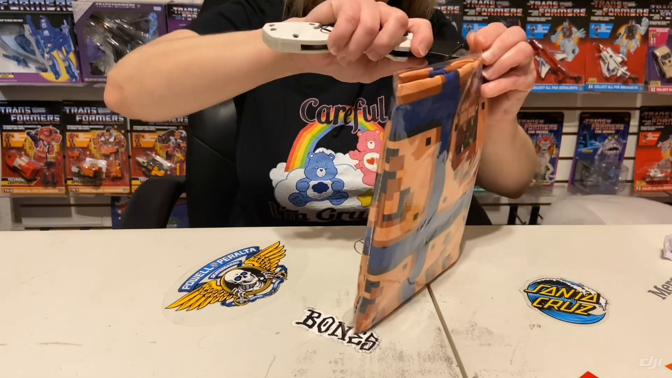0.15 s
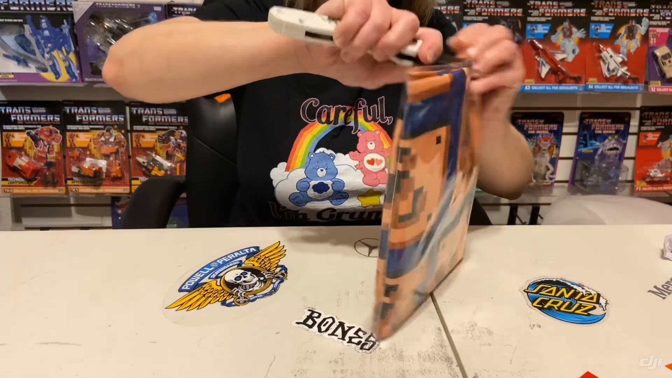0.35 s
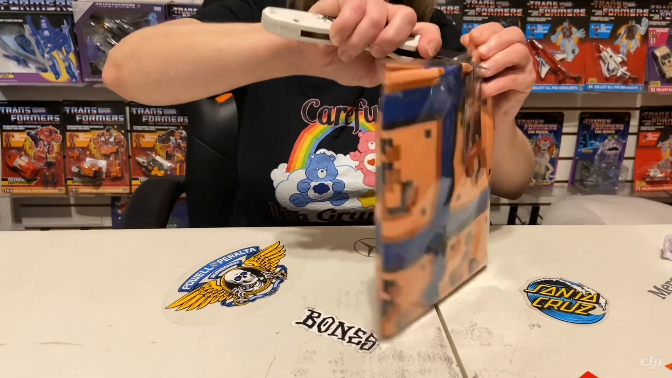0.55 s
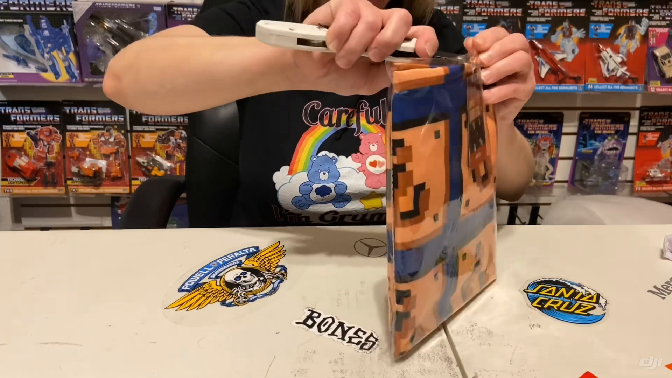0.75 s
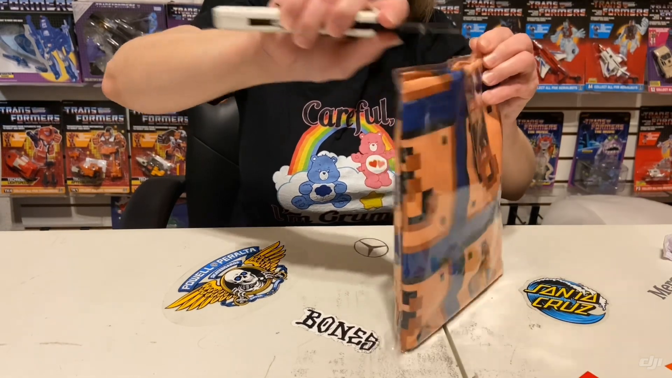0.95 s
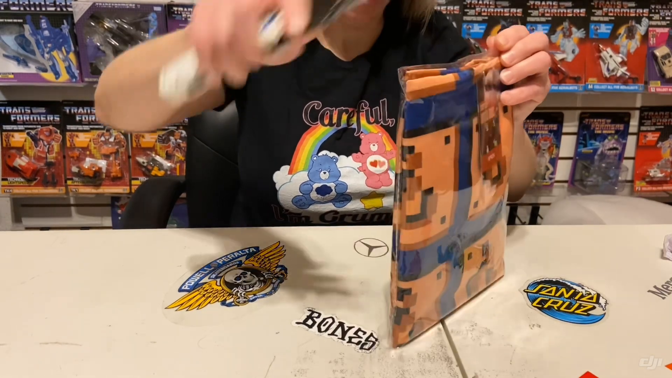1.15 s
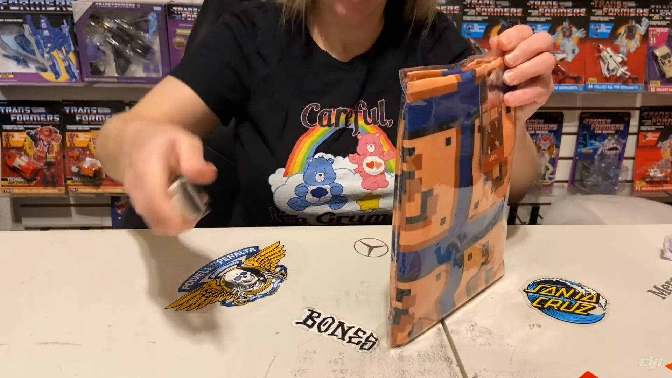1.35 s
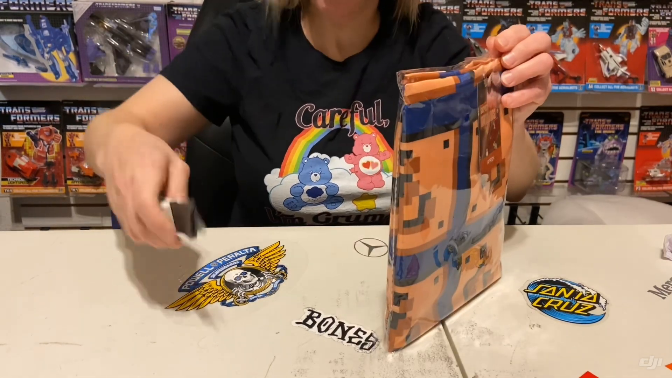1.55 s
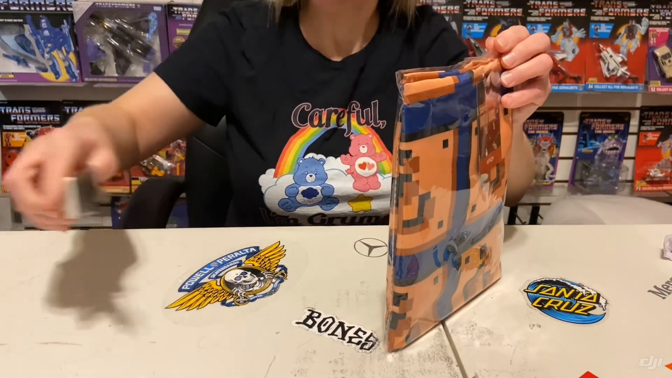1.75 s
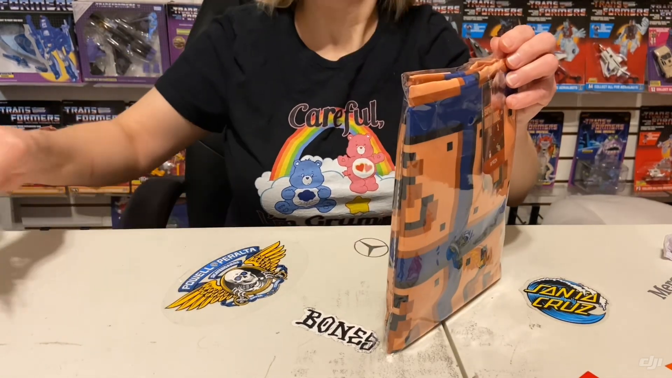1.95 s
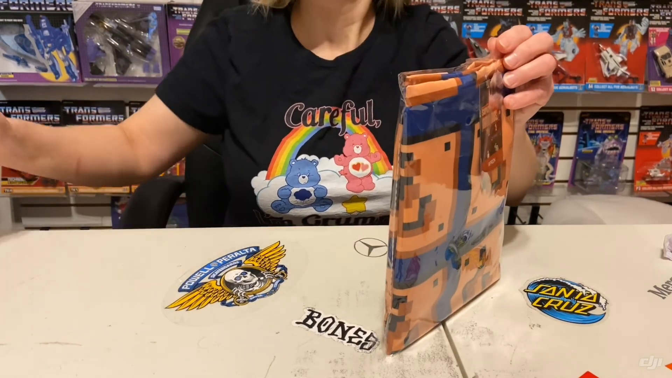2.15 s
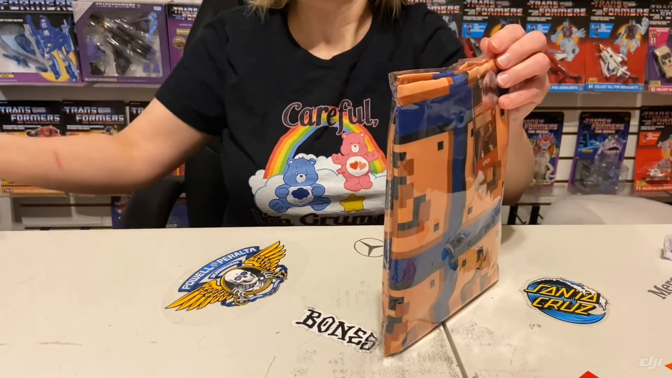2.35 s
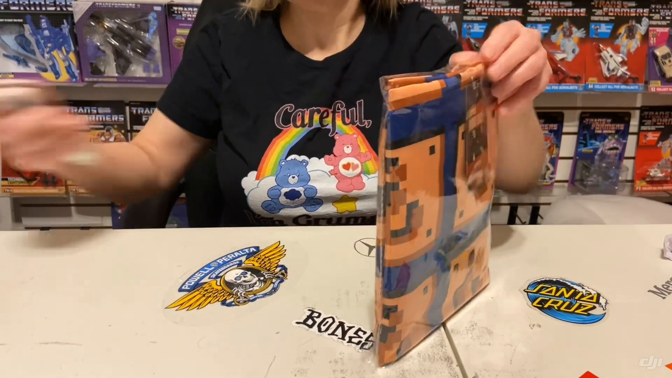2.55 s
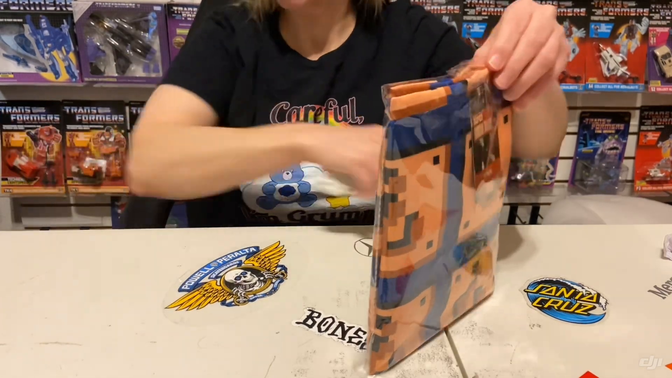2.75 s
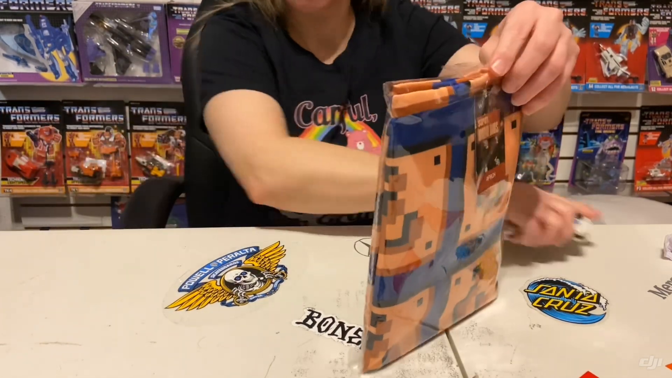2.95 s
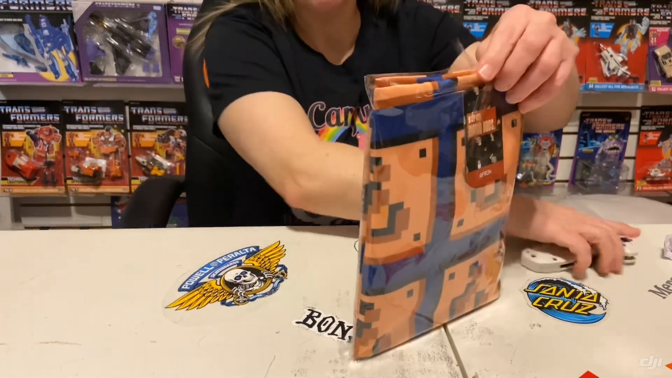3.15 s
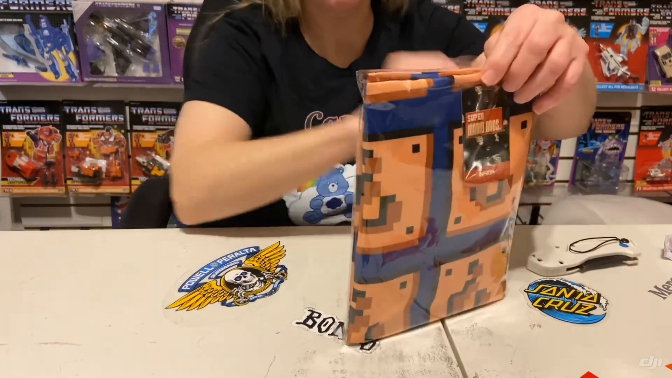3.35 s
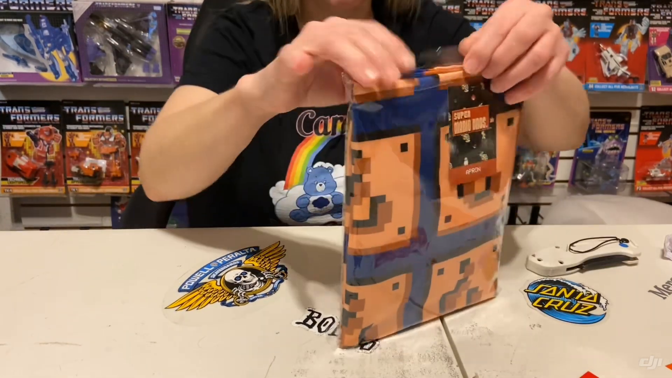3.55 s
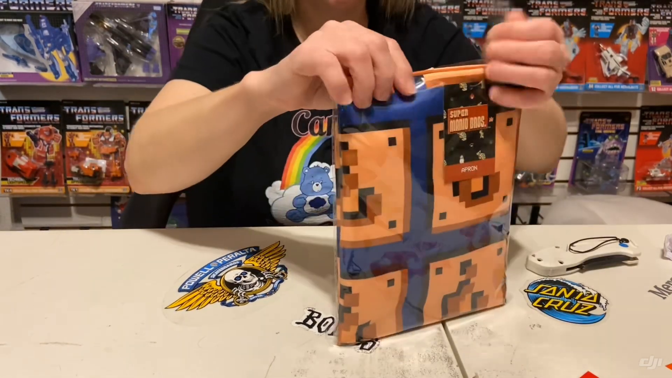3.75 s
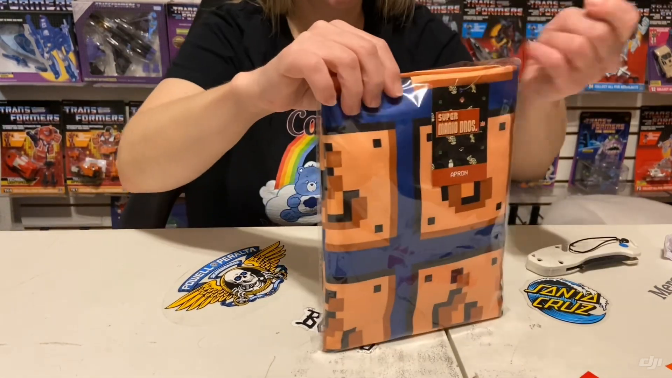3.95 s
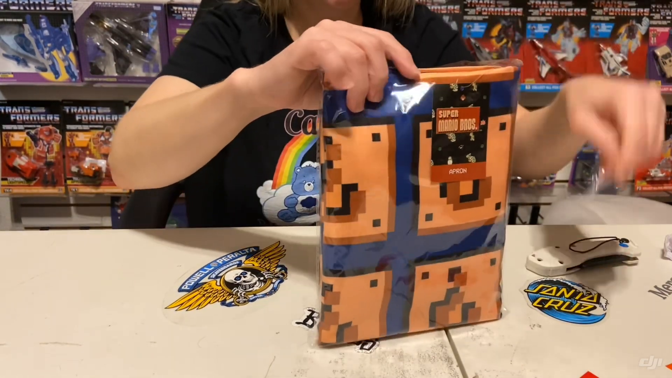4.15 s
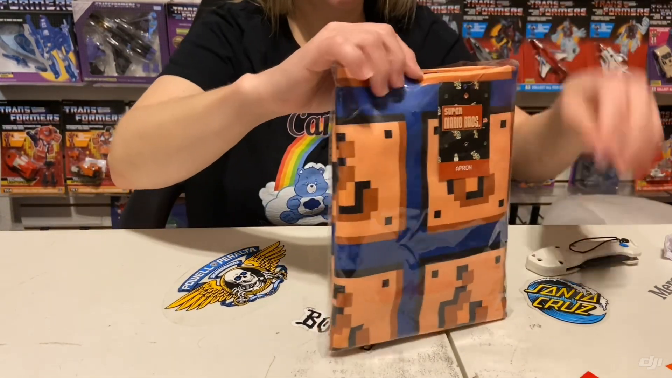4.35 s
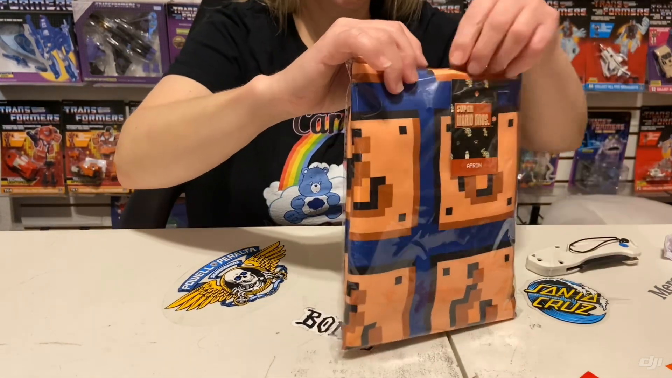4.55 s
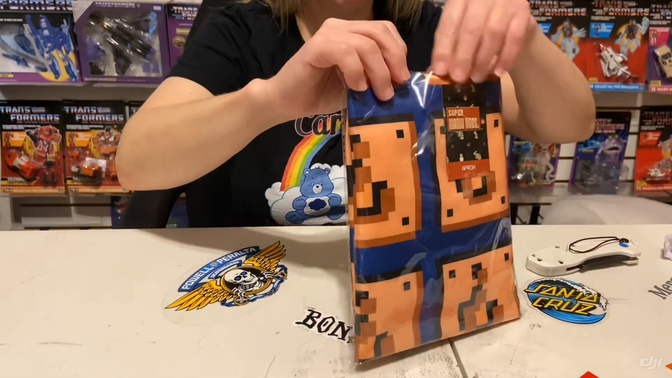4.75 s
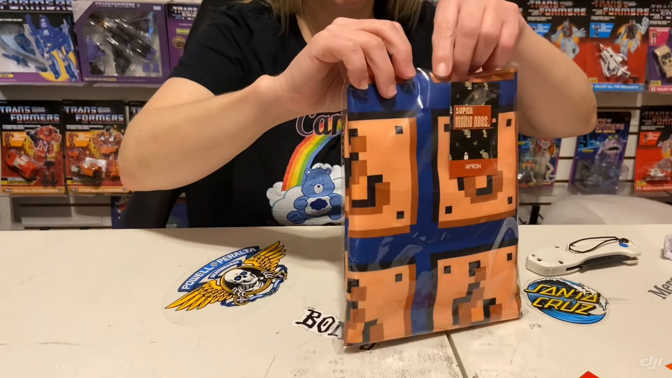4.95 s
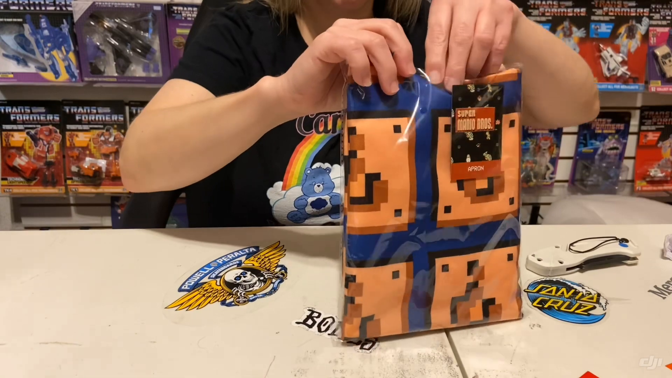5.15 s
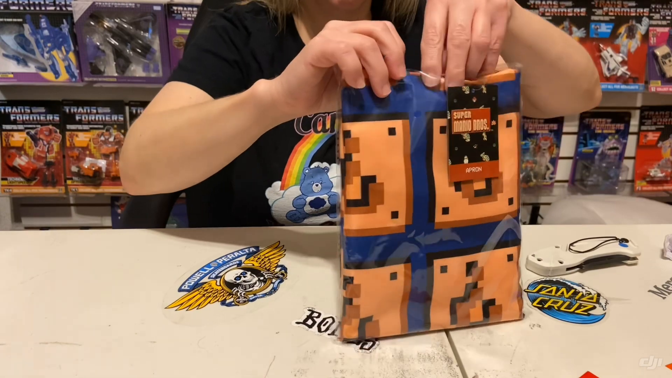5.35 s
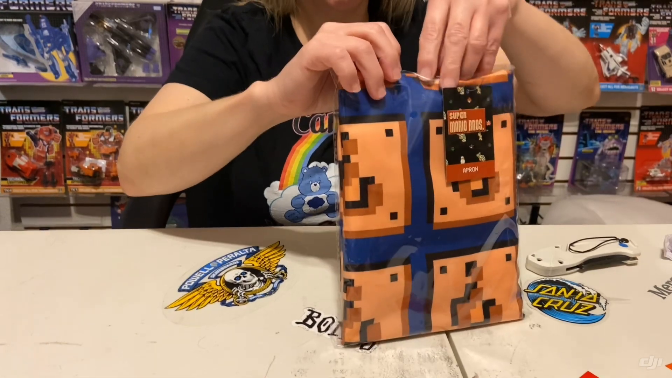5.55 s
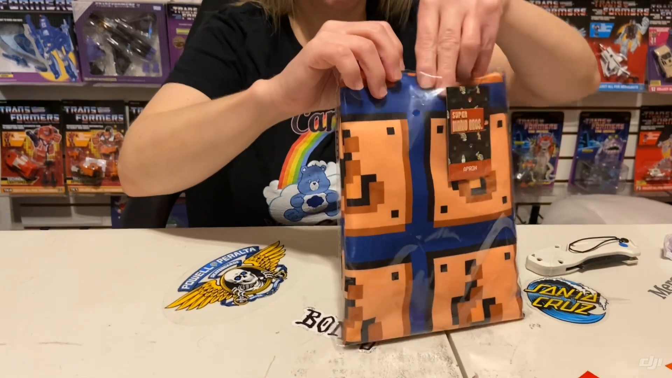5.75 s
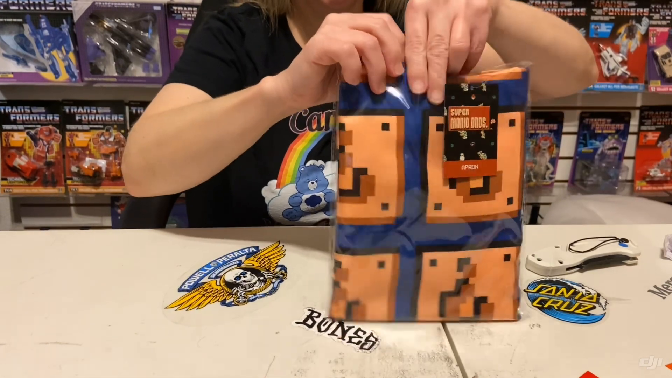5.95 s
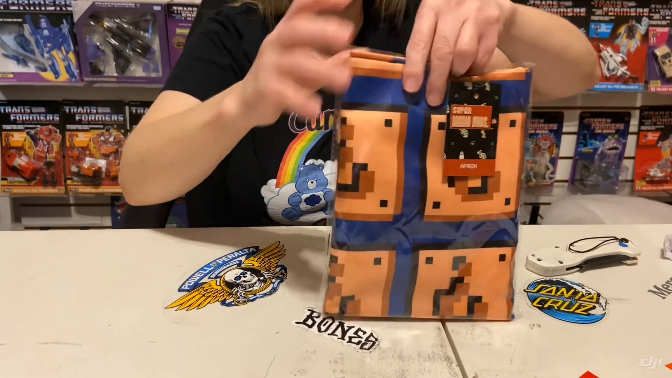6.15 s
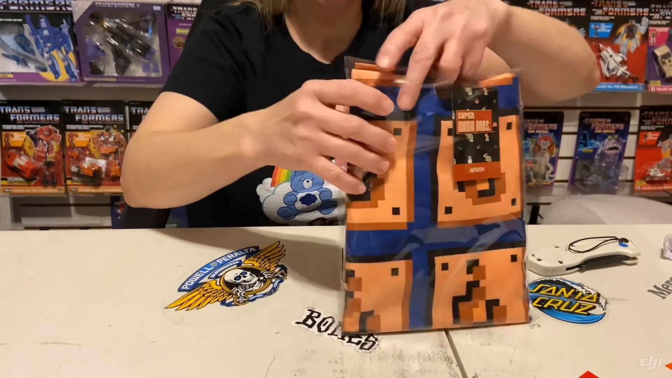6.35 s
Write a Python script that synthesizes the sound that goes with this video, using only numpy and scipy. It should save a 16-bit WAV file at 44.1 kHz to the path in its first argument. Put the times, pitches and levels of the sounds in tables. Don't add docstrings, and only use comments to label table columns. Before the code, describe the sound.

Stiff plastic film crackles and snaps as it is slit, a knife latches shut and drops, then the wrapper crinkles and thuds on a table.

```python
import sys
import numpy as np
from scipy import signal
from scipy.fft import rfft, irfft
from scipy.io import wavfile

SR = 44100
rng = np.random.default_rng(int(sys.argv[2]) if len(sys.argv) > 2 else 0)


def how_loud(loudness_db):
    steps = np.asarray(loudness_db, float) / 20
    return 10 ** steps


def to_wav(s):
    ch = np.atleast_2d(s).T
    pcm = np.round(np.clip(ch, -1, 1) * 32767)
    wavfile.write(sys.argv[1], SR, pcm.astype(np.int16))


N = 282240


def at_hz(points, hz):
    points_hz, values = np.transpose(points)
    return np.interp(np.log(np.maximum(hz, 1)), np.log(points_hz), values)


def rms_one(x):
    return x / np.sqrt(np.mean(x ** 2) + 1e-20)


def band(x, low_hz, high_hz):
    edges_hz = [low_hz, min(high_hz, 0.45 * SR)]
    return signal.sosfilt(signal.butter(2, edges_hz, "band", fs=SR, output="sos"), x)


def colour(x, spectrum):
    gain = how_loud(at_hz(spectrum, np.fft.rfftfreq(len(x), 1 / SR)))
    return irfft(rfft(x) * gain, len(x))


def drift(rate_hz):
    r = np.exp(-2 * np.pi * rate_hz / SR)
    slow = signal.lfilter([1], [1, -2 * r, r * r], rng.standard_normal(N + SR))
    return rms_one(slow[SR:])


def ring(drive, hz, t60):
    r, w = how_loud(-60 / (t60 * SR)), 2 * np.pi * hz / SR
    return signal.lfilter([0, np.sin(w)], [1, -2 * r * np.cos(w), r * r], drive + 1e-18)


def add(out, start_s, burst):
    i = round(start_s * SR)
    out[i:i + len(burst)] += burst[:N - i]


# frequency in Hz, level in dB per Hz.
AIR = [(25, -25), (60, -4), (150, -13.5), (300, -14), (700, -18.5), (2000, -26), (6000, -42), (13000, -45)]


def still_air():
    return how_loud(-76.5) * rms_one(colour(rng.standard_normal(N), AIR))


# peak in seconds, crackle level in dB, rise and fall in seconds per 20 dB, dull rustle in dB relative
MOVES = [
    (0.0, -54, .1, 0.05, 1),
    (.104, -47.5, 0, 0.16, -14),
    (.29, -55.5, 0.5, 0, -4.5),
    (0.396, -31.5, 0.0756, 0.1969, -6.5),
    (.53, -42.5, 0.24, 0.02, -6),
    (.69, -50.5, .3, 0.4, -8.5),
    (0.909, -36, 0.09, 0.1862, -6.5),
    (1.22, -72.5, 0.8, 0, 7.5),
    (1.43, -65.5, .07, 0.32, -4),
    (2.169, -73, .5, 0.1, -.5),
         (2.501, -53, .04, 1.1, -3), (2.68, -47.5, 0.15, 0.08, -8), (2.86, -46.5, .07, .07, -3),
                 (3.12, -52.5, .4, .2, -5), (3.367, -51.5, .3, 0.16, -15), (3.5, -53.5, .15, 0.75, 0.5),
                 (3.709, -39.5, 0.18, 0.35, -13), (3.99, -57.5, .4, .45, -9.5), (4.34, -55.5, 0.11, .6, -9),
                 (4.616, -48, .12, .17, -15), (4.873, -53, .16, .5, -4), (5.27, -52, 1.2, 0.24, -3.5),
                 (5.49, -51, 0.1, 0.091, -8), (5.798, -51, 0.61, .35, -0.8), (6.02, -39, 0.14, .09, -9),
                 (6.126, -38.5, 0.067, 0.046, -6.5), (6.23, -47, 0.037, 4.6, -5.5)]


def handling():
    t = np.arange(0, N, 32) / SR
    peak_s, peak_db, rise_s, fall_s, dull_db = np.transpose(MOVES)[:, :, None]
    move_db = peak_db - 20 * np.where(t < peak_s, (peak_s - t) / rise_s, (t - peak_s) / fall_s)

    def power_sum_db(level_db):
        return 20 * np.log10(np.sqrt(np.sum(how_loud(level_db) ** 2, axis=0)) + 1e-6)

    bright, dull = power_sum_db(move_db), power_sum_db(move_db + dull_db)
    hit_s, blow_db, _, deep_db, _ = np.transpose(BLOWS)[:, :, None]
    shudder_db, shudder_t60_s = -13.5, 0.6
    shake_db = shudder_db + blow_db + deep_db / 2 - 60 * np.abs(t - hit_s) / shudder_t60_s
    shake = (t > hit_s) * how_loud(shake_db)
    drag = how_loud(-65 + 0.67 * (dull + 58))
    low = 10 * np.log10(drag ** 2 + np.sum(shake ** 2, axis=0))
    return [np.interp(np.arange(N) / SR, t, level_db) for level_db in (bright, dull, low)]


# frequency in Hz, level in dB per Hz.
FILM = [(200, 0.5), (600, 3.5), (1250, 5), (1900, 0), (3500, -9), (8000, -12), (11500, -15)]


def crackle(bright_db, dull_db, per_s=1200.0, spread_db=2.5, clump_db=4.5, rub=0.45, still_db=-63.5):
    born = rng.random(N) < per_s * how_loud(clump_db * drift(25.0)) / SR
    sizes = how_loud(spread_db * np.minimum(rng.exponential(1, N), 2.2))
    grains = signal.lfilter([1], [1, -0.93], born * sizes) * rng.standard_normal(N)
    moving = np.clip((bright_db - still_db) / 9.7, 0, 1)
    rub_level = rub + (1 - rub) * (1 - moving)
    film = colour(moving * rms_one(grains) + rub_level * rng.standard_normal(N), FILM)
    bright, dull = band(film, 2000, 13000), band(film, 300, 2000)
    patchy = how_loud(3.26 * drift(17.0))
    return how_loud(bright_db) * rms_one(bright) + how_loud(dull_db) * rms_one(dull * patchy)


def rumble(level_db, lump_db=3.0):
    drag = rng.standard_normal(N) * how_loud(lump_db * drift(13.0))
    return how_loud(level_db) * rms_one(band(band(drag, 36, 210), 42, 300))


# start in seconds, peak level in dB, pitch in Hz.
TICKS = [(0.0611, -48, 2220), (0.1935, -39, 9890), (0.195, -45, 660), (0.2257, -38, 634),
         (0.2479, -43, 10240), (0.304, -34, 2650), (0.3105, -38, 5080), (0.3449, -40, 1550),
         (0.4043, -21, 9760), (0.4365, -24, 4740), (0.4694, -30, 9430), (0.4866, -29, 7200),
         (0.5198, -27, 9470), (0.5674, -41, 640), (0.6392, -41, 2500), (0.6667, -36, 9940),
         (0.6826, -40, 1420), (0.7547, -37, 10440), (0.7552, -44, 4120), (0.7677, -42, 10070),
         (0.7792, -48, 2640), (0.8106, -40, 640), (0.8253, -35, 2470), (0.8298, -39, 9450),
         (0.845, -36, 10170), (0.853, -40, 10110), (0.8538, -41, 1390), (0.8844, -27, 6890),
         (0.9174, -29, 7170), (0.9293, -30, 9970), (0.9308, -37, 1290), (0.9757, -34, 600),
         (0.9827, -33, 9770), (1.0231, -43, 700), (1.0852, -43, 7420), (1.1284, -50, 2220),
         (1.1548, -46, 6690), (1.18, -47, 1260), (1.2701, -51, 640), (1.4841, -57, 1450),
         (1.5896, -53, 2070), (1.8577, -61.5, 650), (2.0036, -43, 3920), (2.053, -49, 2530),
         (2.1009, -38, 6210), (2.4878, -49, 2210), (2.488, -46, 6470), (2.596, -33, 6880),
         (2.6055, -41, 650), (2.6816, -35, 7620),
         (2.8684, -39, 605), (2.8916, -40, 2490), (2.9248, -46, 590), (2.955, -45, 10010),
                (3.0645, -49, 630), (3.1121, -39, 9300), (3.127, -29, 3740), (3.3069, -40, 9650),
                (3.3147, -42, 9700), (3.4778, -40, 1480), (3.5192, -29, 6790), (3.5249, -37, 2930),
                (3.525, -32, 6980), (3.5279, -44, 1370), (3.537, -26, 10200), (3.5681, -35, 4540),
                (3.5771, -38, 10320), (3.5988, -41, 1480), (3.6205, -33, 2800), (3.6352, -33, 7330),
                (3.6457, -37, 1410), (3.6716, -31, 9830), (3.6761, -34, 1470), (3.6768, -33, 6990),
                (3.6863, -24, 2690), (3.6896, -31, 9600), (3.697, -37, 650), (3.7032, -26, 1620),
                (3.721, -23, 2910), (3.7759, -31, 7030), (3.7976, -23, 9960), (3.8736, -38, 6620),
                (3.9285, -27, 1320), (3.9769, -34, 1570), (3.9841, -36.5, 640), (3.9886, -35, 10680),
                (4.0921, -44.5, 9770), (4.1183, -50, 1220), (4.1657, -43, 2670), (4.1904, -43, 2750),
                (4.2226, -29, 4740), (4.3129, -27, 4500), (4.3171, -30, 4770), (4.3269, -36, 6740),
                (4.3648, -36, 7050), (4.382, -37, 4340), (4.4655, -52, 630), (4.4763, -37, 6900),
                (4.5222, -35, 2620), (4.5536, -46, 10060),
         (4.5558, -48, 1490), (4.5601, -49, 1530), (4.5823, -35, 1520), (4.5823, -27, 6000),
              (4.5965, -32, 1460), (4.63, -34, 4370), (4.6683, -34, 6660), (4.6688, -39, 2900),
              (4.692, -34, 9400), (4.6925, -39, 4380), (4.693, -43, 1480), (4.705, -44, 1440),
              (4.7382, -45, 7430), (4.7629, -49, 1380), (4.7968, -34, 5110), (4.8774, -41, 2110),
              (4.921, -40, 6800), (4.922, -42, 2510), (5.0136, -42, 4370), (5.1218, -42, 2190),
              (5.1852, -43, 1480), (5.2246, -38, 3840), (5.2503, -41, 9960), (5.2508, -39, 4560),
              (5.2612, -40, 9710), (5.3256, -43, 1500), (5.386, -51, 9820), (5.3949, -43, 2170),
              (5.4196, -39, 4570), (5.4206, -48, 9440), (5.472, -39, 6880), (5.4777, -45, 9920),
              (5.6234, -42, 6290), (5.6284, -45, 2120), (5.6701, -51, 10630), (5.7429, -40, 6490),
              (5.7434, -33, 2780), (5.9237, -42, 6620), (6.0217, -32, 2950), (6.0981, -40, 9960),
              (6.1148, -28, 6840), (6.1195, -32, 6480), (6.1966, -50, 9760), (6.2009, -36, 4540),
              (6.2019, -43, 1530), (6.242, -33.5, 680), (6.3044, -39, 686), (6.3188, -37, 6600),
              (6.3373, -24, 2700), (6.3433, -29, 3590)]


def ticks(cycles=2.5, least_fade_s=0.0006, rise_cycles=2.5, wobble=1.0, gain_db=-2.0):
    start_s, db, hz = np.transpose(TICKS)[:, :, None]
    t = np.arange(700) / SR
    chance = rng.standard_normal((len(start_s), len(t)))
    roughness = wobble * np.cumsum(chance, axis=1) * np.sqrt(hz / SR)
    phase = 2 * np.pi * hz * t + 3 * chance[:, :1] + roughness
    fade_s = least_fade_s + cycles / (2 * np.pi * hz)
    shape = np.minimum(t * hz / rise_cycles, 1) * np.exp(-t / fade_s)
    bursts = how_loud(db + gain_db) * shape / shape.max(axis=1, keepdims=True) * np.sin(phase)
    out = np.zeros(N)
    for s, burst in zip(start_s[:, 0], bursts):
        add(out, s, burst)
    return out


# snap in seconds, level in dB, body and edge in dB relative to it.
SNAPS = [(0.0784, -41, -6.5, 9), (0.083, -40.5, -23, 9), (.096, -28, -8, 1), (0.223, -49.5, 11.5, 5.5),
         (0.271, -48, -15, 7.5), (0.2781, -43.5, -8, 3), (0.3044, -35.5, -8, 1), (.3325, -32.5, -15, -5),
         (.3448, -45, -6, -8), (0.3666, -28.5, -5, -14.5), (.381, -23.5, -5.5, 7.5),
         (0.4196, -33.5, -2.5, 10), (0.5063, -28.5, -17, -3), (.5381, -41, 1.5, 4.5),
         (0.6162, -49, 4, 6), (.66, -39, -12, 4), (0.6674, -38.5, -7, -3), (.8194, -33.5, -3.5, 3.5),
         (0.8883, -31, -7, 7), (0.895, -31, -7, 3), (0.9541, -28.5, -4, 5), (1.0478, -45, -3, -4),
         (1.0848, -49, 0, 1), (1.1547, -56, -23, 0), (1.169, -46.5, -7, -12),
         (1.225, -45.5, -12.5, -5.5), (1.257, -50.5, -4, -5), (1.322, -57, -12, 1.5),
         (1.5886, -65, 6.5, -23),
         (2.4453, -43, -11, 0), (2.5145, -33.5, -13.5, -6), (2.6022, -35, -13, -2.5),
           (2.6565, -43, -6, -10.5), (2.6713, -37, -11, -1), (2.757, -51.5, -14, 1),
           (2.7978, -51.5, -20, 6), (2.8472, -41.5, -4.5, 8), (2.89, -47, -4.5, -7),
           (2.9386, -43, -1.5, -6), (2.9586, -45.5, -6, -6), (3.0311, -35.5, -16, 1.5),
           (3.121, -33, 5.5, -17.5), (3.1781, -46, 6, -16), (3.2007, -25.5, 13, -10),
           (3.3007, -39, -2, 4.5),
         (3.44, -40, -5, -6), (3.455, -36, -6, -3), (3.4776, -36, -8, 2.5), (3.514, -42, -18, -14),
           (3.5196, -37, -17, 2), (3.535, -48, -6, 16), (3.5478, -33, -11.5, 8), (3.576, -39, -10, -9),
           (3.587, -40, -4, 3), (3.6149, -31, -13.5, 4.5), (3.6451, -42.5, 2, 5), (3.666, -33.5, -5, 7.5),
           (3.685, -33, -8, -15), (3.7028, -26, -11, -12), (3.7204, -38, -22, -12), (3.7542, -30, -6, -1.5),
           (3.7695, -43, -10, 8), (3.7767, -41, 1, 9), (3.7858, -32, -16, -2), (3.798, -38.5, -12, 7),
           (3.8206, -36.5, -8, -2), (3.837, -42.5, -14, 1), (3.8707, -45.5, -10, 4.5),
           (3.9275, -36, 1.5, 1.5), (3.9822, -35.5, -2, 1),
         (4.124, -52, -3, 8), (4.165, -50, -7.5, -17), (4.189, -50.5, -10, -18),
             (4.2223, -36.5, -15, -6.5), (4.2677, -46, -6.5, -14.5), (4.3086, -35, -11.5, -5),
             (4.315, -33, -23, 4), (4.3646, -46.5, -5, 6), (4.3815, -44, -6.5, -3),
             (4.4174, -49.5, -25, 9.5), (4.5215, -36, -19, -3), (4.582, -32.5, -10, -8),
             (4.596, -39.5, 0, 7), (4.6299, -41, -16, 7), (4.6487, -39.5, -24, -3), (4.6684, -43, -6, -2),
             (4.692, -46, -16, 9), (4.7664, -42.5, -10, -2), (4.797, -48.5, -2, 10.5), (4.836, -53, -5, 19),
             (4.857, -47.5, 2.5, 11.5), (4.927, -40, -6, 2), (5.0096, -49, -3, 10.5),
             (5.042, -43.5, -0.5, -2), (5.1838, -44, -21, -14), (5.2177, -44, -2, -11),
             (5.2503, -48, 0, -3), (5.2647, -33, -10, 5.5),
         (5.3952, -47, 0, -3), (5.4306, -46, 0, -2), (5.467, -47, 17, 4), (5.633, -55.5, 17.5, 7.5),
           (5.73, -50, -8, -3), (5.7781, -39, -5, 2), (5.7933, -36, -4.5, -.5), (5.8798, -52.5, -14, 9),
           (5.907, -49.5, -23, 12.5), (5.9396, -48, 3.5, 4), (5.9632, -42.5, -2.5, 8.5),
           (6.0204, -38.5, -33, 5.5), (6.0354, -36.5, -7.5, 2.5), (6.1155, -41, -21, 2.5),
           (6.2005, -43, -7, 7), (6.2298, -42, -13, -6), (6.2394, -34.5, -4, 9.5), (6.255, -32.5, -24, -17),
           (6.302, -34.5, -6, 6), (6.3366, -30.5, -8.5, -11), (6.3684, -37.5, -17, -6)]


def snaps(body_fade_s=0.0022, mid_db=-3.5, body_db=-3.5, edge_db=-4.5, second=0.33, rise_s=0.0005):
    rows = np.array(SNAPS)
    snap_s, snap_db, body_rel_db, edge_rel_db = rows.T
    lead = 176
    t = (np.arange(900) - lead) / SR
    after = np.maximum(t, 0)
    creak = how_loud(-15.0) * np.exp(-np.abs(t) / 0.0012)
    slip_gap_s = 0.0008 + 0.002 * np.abs(np.tanh(rng.standard_normal((len(rows), 1))))
    since = t - slip_gap_s

    def two_slips(fade_s):
        first = np.minimum(after / rise_s, 1) ** 2 * np.exp(-after / fade_s)
        return creak + first + second * (since > 0) * np.exp(-np.abs(since) / fade_s)

    mid_noise, body_noise, edge_noise = rng.standard_normal((3, len(rows), len(t)))
    thud = body_noise * after * np.exp(-after / body_fade_s)
    air_pocket = 0.96 * band(thud, 530.0, 781.2)
    parts = [(band(mid_noise * two_slips(0.0013), 2000, 6000), snap_db + mid_db),
             (band(thud, 440, 2040) + air_pocket, snap_db + body_rel_db + body_db),
             (band(edge_noise * two_slips(0.0007), 6000, 13000), snap_db + edge_rel_db + edge_db)]
    bursts = 0
    for part, level_db in parts:
        loudness = part[:, lead:lead + 220].std(axis=1, keepdims=True)
        bursts = bursts + part / loudness * how_loud(level_db)[:, None]
    out = np.zeros((4, N))
    for k, (s, burst) in enumerate(zip(snap_s, bursts)):
        add(out[k % len(out)], s - lead / SR, burst)
    return out


# hit in seconds, level in dB,
# hardness in dB per octave, deep modes in dB, handle knock in dB.
BLOWS = [(.372, -40, 7, 2, -63), (2.157, -58.5, 4.5, 11.5, -38), (3.122, -24.5, 1.5, -4, -44),
         (3.178, -26, -1, -7, -39), (3.2007, -18, 4, -17, -11), (3.222, -19, 1, -5, -49),
         (3.299, -39, -3, 3, -59), (3.66, -60, -4, 9, -72), (3.975, -58, -5, 8, -72),
         (4.78, -50, 3, -4, -66), (5.103, -53, 0, 5, -70), (4.951, -54, 3, 17, -77),
         (5.295, -53.5, 3, 16, -70), (5.431, -61, 0, 24, -70), (5.466, -18.5, -9, -11, -44),
         (5.49, -38.5, 8, 28, -46), (5.588, -45, 4, 19, -50), (5.636, -25, 2, -6, -40),
         (5.648, -30, -14, -2, -50), (5.676, -46, 6, -4, -44.5), (5.731, -37.5, 1.5, 22, -50),
         (5.789, -53, 7, -4, -54), (5.87, -61.5, -8, 20, -78)]
# frequency in Hz, level in dB, t60 in seconds.
TABLE = [(59.9, -12, .35), (107, -7.5, 0.16), (165, -1, 0.18), (213.5, -10, 0.14), (253.3, -1.5, 0.11),
         (308, -3, .13), (353, -4.5, 0.12), (395, -0.5, 0.09), (481, -7, 0.1), (591, -8, 0.08),
         (661, -10, 0.098), (776, -9.5, 0.051), (868, -14.5, 0.067), (1200, -17.5, 0.031)]
# frequency in Hz, level in dB, t60 in seconds.
HANDLE = [(547, -5, 0.048), (789, 0, 0.025), (1320, -2.5, 0.031)]


def table(swell_cycles=0.93, crack_db=5.0, crack_s=0.0032, detune=0.01, pressed_s=5.4, damping=1.3):
    t, out = np.arange(SR // 2) / SR, np.zeros(N)
    uneven = rng.standard_normal((len(BLOWS), len(TABLE) + len(HANDLE)))
    crack_noise = rng.standard_normal((len(BLOWS), 1500))
    cracks = band(crack_noise * np.exp(-t[:1500] / crack_s), 640, 2400)
    for (s, blow_db, hard_db, deep_db, knock_db), odd, crack in zip(BLOWS, uneven, cracks):
        levels = [blow_db + db + hard_db * np.log2(max(hz, 160) / 250) + deep_db * (hz < 130)
                  for hz, db, t60 in TABLE]
        levels += [knock_db + db for hz, db, t60 in HANDLE]
        modes = np.zeros(len(t))
        for (hz, db, t60), level_db, u in zip(TABLE + HANDLE, levels, odd):
            damp = damping if s > pressed_s and 190 < hz < 420 else 1
            envelope = how_loud(level_db + 1.5 * u - 60 * t / t60 * damp)
            swell = np.minimum(t * hz / swell_cycles, 1)
            phase = 2 * np.pi * hz * (1 + detune * u) * t + 3 * u * (t60 > 0.05)
            modes += envelope * swell * np.sin(phase)
        add(out, s, modes)
        add(out, s, how_loud(knock_db + crack_db) * crack / np.abs(crack).max())
    return out


# time in seconds, level in dB.
SLIDE = [
    (1.84, -94),
    (1.985, -70.5),
    (2.04, -91),
    (2.053, -65),
    (2.103, -43),
    (2.12, -59),
    (2.14, -49),
    (2.155, -53),
    (2.17, -87.5),
]
# click in seconds, level in dB, tilt in dB per octave.
LATCH = [(1.859, -78, -7.5), (2.004, -59, 0), (2.05, -52.5, -3), (2.076, -62, 8), (2.091, -57, 8),
         (2.103, -52, -1), (2.136, -40.5, 1), (2.1516, -35.5, -3.5), (2.1562, -17, 4.5), (2.161, -33, -3.5),
         (2.1694, -37.5, 14), (2.194, -40.5, -10), (2.219, -38.5, -3)]
# frequency in Hz, width in Hz, level in dB.
KNIFE = [(900, 900, -26), (2250, 270, -2), (2750, 220, 1.5), (3420, 370, -1.5), (4700, 1500, -2),
         (6080, 740, -1), (7400, 920, -9), (8600, 570, -14.5), (9560, 650, -16.5), (11300, 2600, -15.5)]


def knife(fade_s=0.0025, gain_db=4.5, slide_db=13.0):
    click_s, click_db, tilt_db = np.transpose(LATCH)
    at = np.round(click_s * SR).astype(int)
    path_db = np.interp(np.arange(N) / SR, *np.transpose(SLIDE), left=-200, right=-200)
    slide = how_loud(slide_db + path_db + 3.2 * drift(66.0))
    out = np.zeros(N)
    for hz, width_hz, db in KNIFE:
        noise = rng.standard_normal(N)
        clicks = np.zeros(N)
        clicks[at] = how_loud(click_db + gain_db + tilt_db * np.log2(hz / 3000))
        fading = signal.lfilter([1], [1, -np.exp(-1 / (fade_s * SR))], clicks)
        drive = noise * (fading + slide / 8)
        drive += slide * noise * 0.17 * (5000 < hz < 8000)
        rung = band(ring(drive, hz, 2.56 / width_hz), 0.67 * hz, SR / 2)
        out += how_loud(db) * np.sqrt(width_hz / SR) * rung
    return out


def scuff(level_db, from_s=4.77, until_s=5.92, gain_db=-2.5, lump_db=3.5, low_hz=290.0):
    t = np.arange(N) / SR
    rub = rng.standard_normal(N) * how_loud(lump_db * drift(22.0))
    stirred = sum(ring(rub, hz, t60 / 2) / np.sqrt(t60) for hz, db, t60 in TABLE if low_hz < hz < 830)
    pressing = np.clip(np.minimum(t - from_s, until_s - t) * 20, 0, 1)
    return how_loud(level_db + gain_db) * rms_one(stirred) * pressing


# frequency in Hz, t60 in seconds.
ROOM_T60 = [(100, 0.1), (500, 0.24), (2500, 0.26), (12000, 0.18)]


def room(x, wet_db, low_db=0):
    t = np.arange(SR // 2) / SR
    edges_hz = 40 * 2.0 ** np.arange(10)
    tail = np.zeros(len(t))
    for low_hz, high_hz in zip(edges_hz, edges_hz[1:]):
        decay_db = low_db * (high_hz < 400) - 60 * t / at_hz(ROOM_T60, 2.0 * low_hz)
        tail += band(rng.standard_normal(len(t)), low_hz, high_hz) * how_loud(decay_db)
    tail *= np.clip((t - 0.002) / 0.0025, 0, 1)
    response = how_loud(wet_db) * tail / np.sqrt(np.sum(tail ** 2))
    response[0] = 1
    return signal.fftconvolve(x, response)[:N]


def scene():
    bright_db, dull_db, rumble_db = handling()
    film = room(crackle(bright_db, dull_db), wet_db=-10.0) + room(ticks(), wet_db=-9.5)
    film += sum(room(spot, wet_db=-7.5) for spot in snaps())
    blows = room(table(), wet_db=-5.5, low_db=-5.0) + room(knife(), wet_db=-7.5)
    return (still_air() + film + rumble(rumble_db) + blows + scuff(bright_db))[None]


def roll_off(x):
    return signal.sosfilt(signal.butter(12, 13010, fs=SR, output="sos"), x)


def record(dry):
    ceiling = 0.8
    rounded = ceiling * np.tanh(dry / ceiling)
    top_cut = signal.cheby2(14, 60, 12535, fs=SR, output="sos")
    return roll_off(signal.sosfilt(top_cut, rounded))


dry = scene()
out = record(dry)
to_wav(out)
```